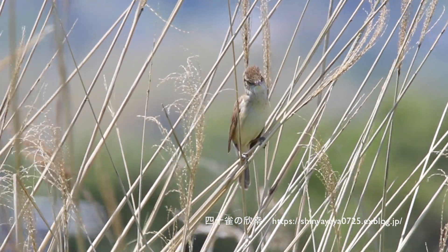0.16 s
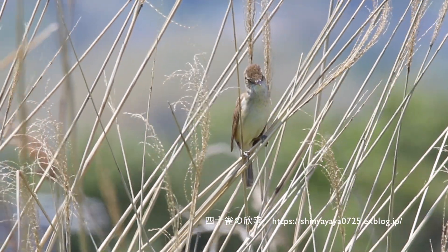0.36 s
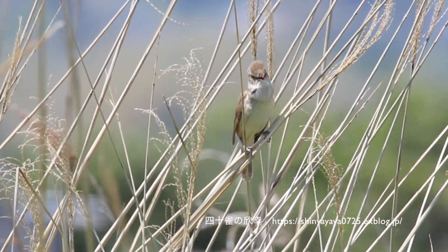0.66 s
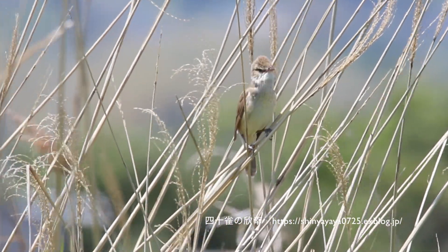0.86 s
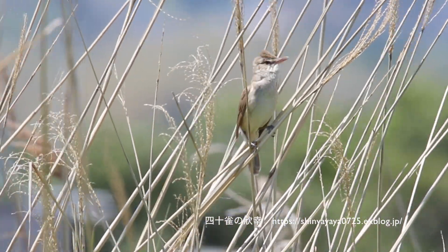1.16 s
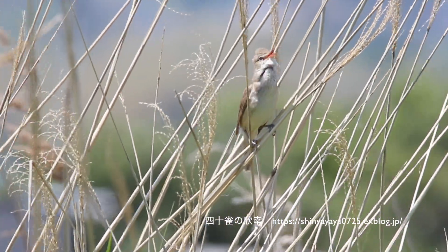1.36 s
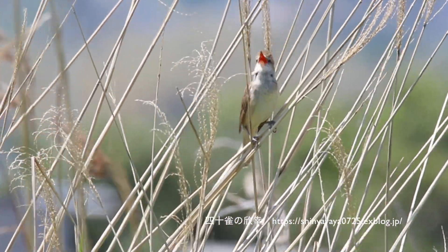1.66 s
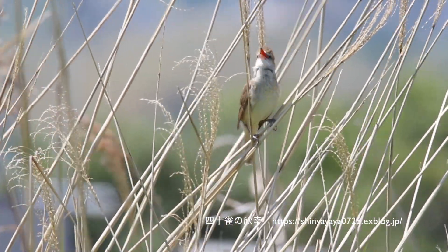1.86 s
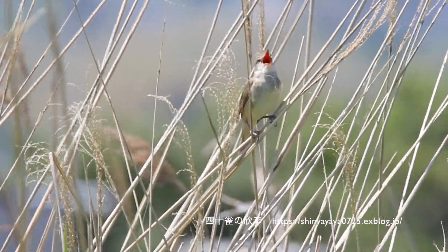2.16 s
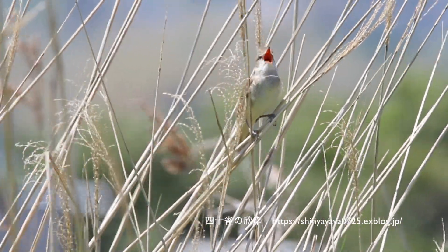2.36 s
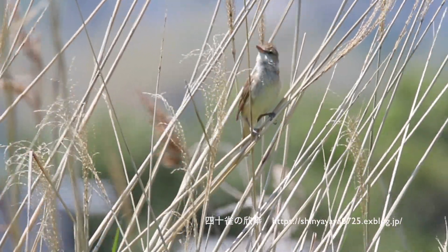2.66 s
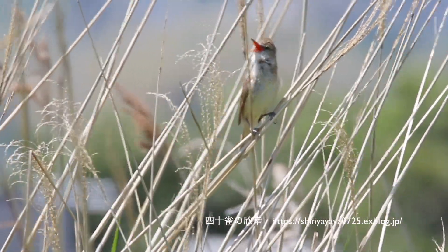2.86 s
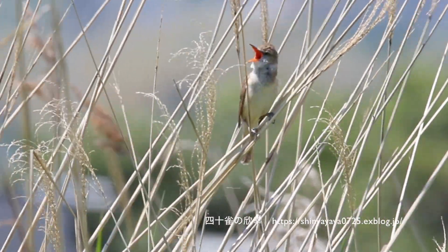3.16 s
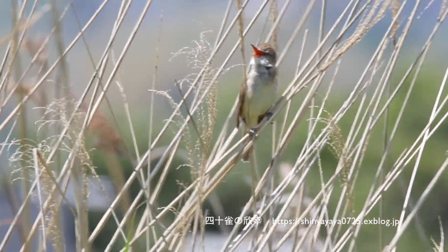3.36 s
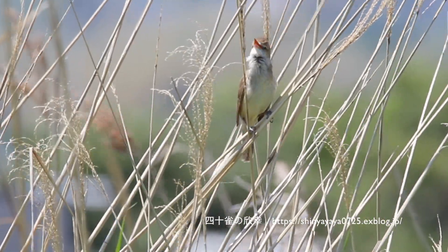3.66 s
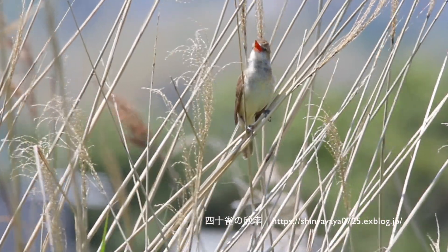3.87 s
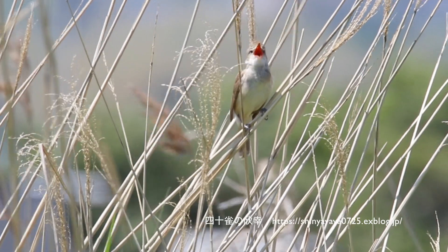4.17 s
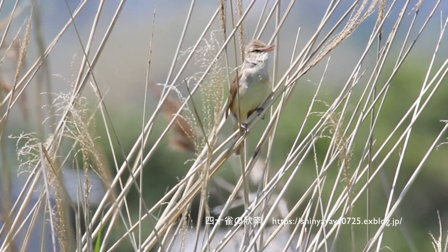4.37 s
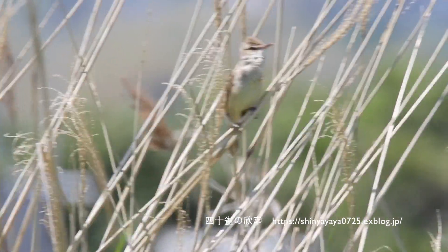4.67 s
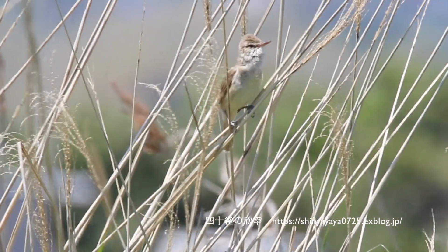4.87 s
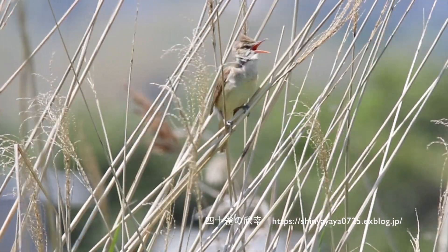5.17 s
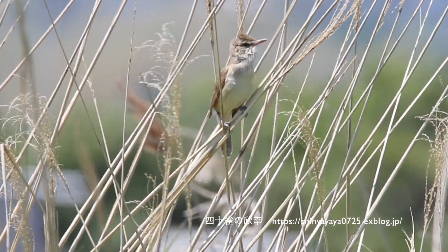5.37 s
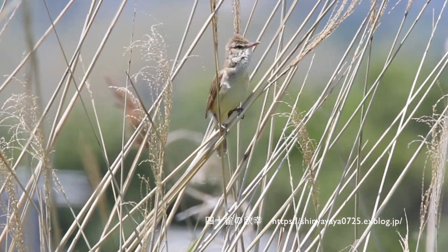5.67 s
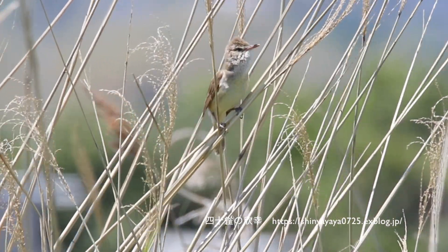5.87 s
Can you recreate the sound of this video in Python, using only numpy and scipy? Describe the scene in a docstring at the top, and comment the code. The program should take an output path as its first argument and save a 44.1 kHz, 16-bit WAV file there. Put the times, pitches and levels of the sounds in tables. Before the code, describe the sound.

In a reed bed, one small bird a few metres away opens with three separate notes, then runs through a harsh, grating pattern four times: paired croaks, a husky squeak, and high ticking rasps. It ends with a few spaced chucks and a lower rattle. The notes are dry with only a faint tail, above a quiet steady background wash, a low hum and slight wind rumble.

```python
"""In a reed bed a reed warbler sings from a stem a few metres away. After a croak, an arching note and a
whistle it repeats one phrase: two low croaks, a thin warbled squeak, then ticks that swell into a loud
high rasp; the song thins out to soft grunts, chucks and one lower rattle. Air sets the membranes of the
syrinx oscillating, their flutter modulates the tone, and throat and bill filter it. The reeds scatter a
faint tail; behind it lie far-off noise, a low drone and puffs of breeze."""
import sys
import numpy as np
from scipy import signal
from scipy.fft import rfft, irfft, next_fast_len
from scipy.io import wavfile
from scipy.ndimage import uniform_filter1d

SR = 44100
rng = np.random.default_rng(int(sys.argv[2]) if len(sys.argv) > 2 else 0)


def generate_wav(signal):
    """Clip the signal to [-1, 1] and save it as 16-bit WAV at the path in sys.argv[1]."""
    frames = np.transpose(np.atleast_2d(signal))
    scaled = np.clip(frames, -1, 1) * 32767
    pcm = np.round(scaled).astype(np.int16)
    wavfile.write(sys.argv[1], SR, pcm)


N = 265526
TIME = np.arange(N) / SR
LAST_TICK_GAP_S = .0086  # from the onset of the last tick to the end of its run-up


def from_db(db):
    """Amplitude grows tenfold with every 20 decibels."""
    return 10 ** (np.asarray(db) / 20)


def rms_one(x):
    """Normalisation: scale a signal to unit rms."""
    return x / np.sqrt(np.mean(x ** 2) + 1e-20)


def add(out, start, sound):
    """Superposition: mix a sound in at a time in seconds."""
    at = max(round(start * SR), 0)
    out[at:at + len(sound)] += sound[:N - at]


def coloured(x, points):
    """Spectral shaping: multiply the spectrum by a curve through (Hz, dB) points."""
    hz, db = np.transpose(points)
    size = next_fast_len(x.shape[-1] + 2048)
    freqs = np.maximum(np.arange(size // 2 + 1) * SR / size, 1)
    gain = from_db(np.interp(np.log(freqs), np.log(hz), db))
    return irfft(rfft(x, size) * gain, size)[..., :x.shape[-1]]


def band_noise(size, low_hz, high_hz, order=2):
    """Band-limited noise of unit rms."""
    sos = signal.butter(order, [low_hz, high_hz], "band", fs=SR, output="sos")
    return rms_one(signal.sosfilt(sos, rng.standard_normal(size + 512))[512:])


def wander(size, rate):
    """Random modulation: a line through Gaussian values, `rate` of them a second."""
    at = np.arange(size) * rate / SR
    return np.interp(at, np.arange(size), rng.standard_normal(size))


def turns(hz):
    """Phase in radians is the running integral of frequency."""
    return 2 * np.pi * np.cumsum(hz) / SR


def swell(size, rise, fall):
    """The envelope of air pressure over one stroke; rise and fall are shares of its length."""
    u = np.linspace(0, 1, size)
    attack = np.sin(np.pi / 2 * np.minimum(u / rise, 1))
    release = np.sin(np.pi / 2 * np.minimum((1 - u) / fall, 1))
    return attack * release


def syrinx(pitch, flutter_hz, swing, depth, scatter, turbulence_db, under_db, second_db, hiss_db,
           third_db=-50, evenness=0.19, edge=1.427):
    """Uneven membrane flutter modulates a tone in frequency (swing) and amplitude (depth)."""
    size, centre = len(pitch), pitch.mean()
    beat = turns(flutter_hz * (1 + 0.313 * wander(size, 599.6))) + rng.uniform(0, 2 * np.pi)
    phase = turns(pitch * (1 - swing * np.cos(beat) + scatter * wander(size, 1518)))
    opening = np.maximum(1 + depth * np.cos(beat) + 0.16 * wander(size, 735), 0)
    turbulence = from_db(turbulence_db) * band_noise(size, centre * 0.85, centre * 1.505, order=3)
    # Unequal cycles add an undertone near half the pitch.
    undertone = from_db(under_db) * band_noise(size, centre * 0.31, centre * 0.71)
    tone = opening * (np.sin(phase) + undertone + turbulence)
    # The membranes can only swing so far, which evens out the beats.
    tone = tone / (uniform_filter1d(tone ** 2, size=17) + .05) ** (evenness / 2)
    # The throat follows the pitch and damps what lies well above it.
    throat = signal.butter(6, centre * edge, fs=SR, output="sos")
    overtones = from_db(second_db) * np.sin(2 * phase) + from_db(third_db) * np.sin(3 * phase)
    hiss = from_db(hiss_db) * band_noise(size, 900, 12500)
    return rms_one(rms_one(signal.sosfilt(throat, tone)) + opening * (overtones + hiss))


def stroke(length, first_hz, last_hz, db, turbulence_db, hiss_db, under_db=-17, rise=0.11, fall=0.45):
    """A pressure-driven oscillation: the grating tone droops and turns purer as the air runs out."""
    size = int((length + 0.003) * SR)
    u = np.linspace(0, 1, size)
    pressure = swell(size, rise, fall)
    droop = 0.15 * u * (1 - pressure)
    pitch = np.interp(u, [.15, .85], [first_hz, last_hz]) * (1 - droop)
    drive = np.clip((pitch.mean() - 2300) / 1500, 0, 1)
    # Low strokes growl with an undertone; hard-pressed ones gain a third partial with their hiss.
    voice = syrinx(pitch, flutter_hz=420 + 90 * drive, swing=0.13 * pressure, depth=.42,
                   scatter=0.082 * pressure, turbulence_db=turbulence_db, under_db=under_db - 7.7 * drive,
                   second_db=-26, hiss_db=hiss_db, third_db=hiss_db - 6.5, evenness=.3)
    return from_db(db) * rms_one(voice * pressure)


def tick(length, hz, db):
    """A transient of the syrinx with a sharp onset and a slight arch in pitch; higher ones hiss more."""
    size = int(length * SR)
    pitch = hz * (0.96 + 0.057 * np.sin(np.linspace(0, np.pi, size)))
    drive = np.clip((hz - 3200) / 700, 0, 1)
    voice = syrinx(pitch, flutter_hz=583, swing=0.13, depth=0.24, scatter=0.049, turbulence_db=1.5,
                   under_db=-43, second_db=-35, hiss_db=-28 + 10.5 * drive, edge=1.28)
    return from_db(db) * rms_one(voice * swell(size, rise=0.12, fall=0.5))


def run_up(end, span, hz, db, stressed_lead=0, stress_db=0, count=12):
    """A pulse train under rising pressure: ticks come slower, longer, louder and higher."""
    last_tick_s, climb_hz_per_s, growth_db_per_s = .0058, 5300, 228.5
    jitter_s, scatter_db = .0002, 1.25
    out = np.zeros(N)
    steps = np.arange(count)  # counted backward from the last tick
    leads = np.cumsum(LAST_TICK_GAP_S * .935 ** steps)
    stress = stress_db * (steps == np.argmin(abs(leads - stressed_lead)))
    for k, lead, (early, louder) in zip(steps, leads, rng.standard_normal((count, 2))):
        back = lead - leads[0]
        level_db = db - growth_db_per_s * back + stress[k] + scatter_db * louder
        sound = tick(last_tick_s * .9 ** k, hz - climb_hz_per_s * back, level_db)
        if lead <= span:
            add(out, end - lead - jitter_s * early, sound)
    return out


def croaks(gap_s=0.0039, slide_hz=145):
    """Three pulses of pressure make a low croak: a gliding accent, then two beats of growl."""
    # Each row: start, lead-in window, stroke spacing and length in seconds; first and last accent pitch
    # and growl pitch in Hz; accent, middle and last beat levels in dB; relative accent hiss in dB.
    calls = [(0.0, 0, .018, 0.043, 2840, 3010, 2680, -26, -25, -38, -30),
             (1.38, .011, 0.022, 0.052, 2515, 2390, 2260, -22.5, -23.5, -21.5, -39),
             (1.472, 0, .018, 0.059, 3044, 3130, 2395, -23, -23.5, -22.5, -24.5),
             (2.011, .011, .018, 0.051, 2547, 2333, 2235, -20.5, -23, -19.5, -37),
             (2.101, 0, 0.022, 0.058, 3153, 3240, 2372, -20, -22.5, -22.5, -26.5),
             (2.9, .011, .019, .054, 2700, 2260, 2230, -22.5, -26.5, -23, -37),
             (2.992, 0, .019, 0.053, 2990, 2880, 2370, -18.5, -23, -21, -33),
             (3.774, .011, .018, 0.053, 2870, 2250, 2280, -22, -20, -20, -28),
             (3.865, 0, 0.02, 0.059, 2800, 2946, 2390, -18, -22.5, -21.5, -33)]
    growl = dict(turbulence_db=-8, hiss_db=-34, rise=0.18)
    out = np.zeros(N)
    for (start, lead, spacing, length, first_hz, last_hz, growl_hz,
         accent_db, middle_db, last_db, hiss_db) in calls:
        beat_s, last_beat_s = spacing - gap_s, max(length - 2 * spacing, gap_s)
        out += run_up(start, lead, first_hz, accent_db - 12.5, count=1)
        rise = .3 if lead >= LAST_TICK_GAP_S else 0.063  # an accent led in by a tick starts gently
        accent = stroke(beat_s, first_hz, last_hz, accent_db,
                        turbulence_db=-10.5, hiss_db=hiss_db, rise=rise)
        middle = stroke(beat_s, growl_hz + slide_hz / 2, growl_hz - slide_hz / 2, middle_db, **growl)
        last = stroke(last_beat_s, growl_hz, growl_hz, last_db, **growl)
        for k, beat in enumerate([accent, middle, last]):
            add(out, start + k * spacing, beat)
    return out


def arch(pause_s=.007):
    """A frequency glide roughened by flutter: after two soft ticks it climbs, breaks and sinks."""
    # The note's contour. Each row: time in seconds, pitch in Hz, level in dB.
    contour = [(.785, 2200, -34), (0.788, 2220, -19), (0.792, 2400, -29), (.801, 2360, -27),
               (.81, 2760, -21.5), (.818, 2958, -20.5), (.826, 3044, -43), (0.832, 3130, -17),
               (.841, 2700, -23), (0.857, 2100, -37)]
    times, hz, db = np.transpose(contour)
    t = np.arange(times[0], times[-1], 1 / SR)
    voice = syrinx(np.interp(t, times, hz), flutter_hz=470, swing=.06, depth=.42, scatter=.04,
                   turbulence_db=-7.5, under_db=-18, second_db=-24, hiss_db=-31, third_db=-31, edge=2.2)
    out = run_up(times[0] - pause_s, span=.02, hz=3400, db=-33, count=2)
    add(out, times[0], from_db(np.interp(t, times, db)) * voice)
    return out


def whistle():
    """Noise and random frequency modulation make a scratchy start; the note leaps, clears and falls."""
    # The slur's contour. Each row: time in seconds, pitch in Hz, level in dB.
    contour = [(1.104, 3210, -42), (1.118, 3680, -36.5), (1.127, 3840, -36.5), (1.132, 5495, -29),
               (1.141, 5550, -28), (1.152, 4900, -34), (1.164, 4370, -39), (1.169, 4430, -55)]
    times, hz, db = np.transpose(contour)
    t = np.arange(times[0], times[-1], 1 / SR)
    hoarse = np.interp(t, [1.128, 1.134], [1, 0])
    jitter = (0.02 + 0.093 * hoarse) * wander(len(t), 1960)
    phase = turns(np.interp(t, times, hz) * (1 + jitter))
    scratch = from_db(-1.5) * hoarse * band_noise(len(t), 2360, 4900) * (1 + 0.54 * wander(len(t), 560))
    voice = np.sin(phase) * (1 - 0.37 * hoarse) + from_db(-22) * np.sin(2 * phase) + scratch
    out = np.zeros(N)
    add(out, times[0], from_db(np.interp(t, times, db)) * rms_one(voice))
    return out


def squeaks(warble_hz=132, swing=0.098, lower_hz=4050, husk_db=-9):
    """Biphonation: one side of the syrinx makes a thin husky warble and the other joins in lower down."""
    # Each row: start and length in seconds; first, top and last pitch in Hz; level in dB;
    # gain of the lower voice in dB ahead of its fade-in.
    calls = [(1.605, 0.079, 5200, 5970, 4600, -34.5, -4), (2.227, 0.076, 5270, 6030, 4870, -37, 5.5),
             (3.123, 0.075, 5100, 5870, 4856, -36.5, 0.5), (4.009, 0.077, 4700, 5860, 5000, -34, -1.5)]
    out = np.zeros(N)
    for start, length, first_hz, top_hz, last_hz, db, lower_db in calls:
        size = int(length * SR)
        u = np.linspace(0, 1, size)
        warble = turns(warble_hz * (1 + 0.149 * wander(size, 140)))
        sweep = np.sin(warble) + 0.35 * np.cos(2 * warble)  # lingers at the top, dips quickly
        pitch = np.interp(u, [0, .3, .55, 1], [first_hz, top_hz, top_hz, last_hz]) * (1 + swing * sweep)
        upper = syrinx(pitch, flutter_hz=503, swing=0.014, depth=0.22, scatter=0.028,
                       turbulence_db=-27, under_db=-18.5, second_db=-16, hiss_db=-18)
        upper *= 1 - 0.28 * np.cos(warble)  # loudest on each downward sweep
        upper *= from_db(3.8 * wander(size, 205))
        lower_phase = turns(lower_hz * (1 + 0.087 * wander(size, 902)))
        lower = np.sin(lower_phase) * (1 - 0.57 * np.sin(warble))
        husk = from_db(husk_db) * band_noise(size, 2900, 6400, order=3)
        voice = upper + from_db(lower_db) * u * lower + husk
        add(out, start, from_db(db) * rms_one(voice * (1.2 + u) * swell(size, rise=0.07, fall=0.25)))
    return out


def rattles(catch_s=.004, gap_s=.0026):
    """Pressure builds through a run of ticks to a short catch, then breaks into a sustained rasp."""
    # Each row: start of the catch, run-up window and lead of the stressed tick in seconds; its stress
    # in dB; length of catch and rasp in seconds; tick pitch, first and last rasp pitch in Hz;
    # last tick and rasp levels in dB; relative turbulence and hiss in dB.
    calls = [(1.7688, .058, .009, -1.5, .022, 3790, 3894, 3670, -22, -18.5, -8, -17),
             (2.399, .063, .053, 6.5, 0.015, 4080, 3965, 3980, -21.5, -17, -2.5, -16),
             (2.538, .047, .009, 7.5, 0.02, 4110, 4070, 4000, -25.5, -17.5, -8.5, -19),
             (3.298, .069, .044, 7.5, 0.016, 4180, 3786, 3970, -20.5, -15.5, -4, -18),
             (3.4597, .041, .037, 1.5, .021, 4130, 4175, 4055, -21, -14.5, -0.5, -17),
             (4.185, .063, .044, 6.5, 0.022, 4030, 4090, 3860, -21.5, -15.5, -9.5, -20),
             (4.3486, .053, .044, 2.5, 0.021, 4170, 4000, 3940, -21.5, -15, 1, -16.5),
             (5.3156, 0.053, .032, 4, .021, 3400, 3060, 2830, -25.5, -19, -10, -27.5)]
    out, onset_s = np.zeros(N), catch_s + gap_s
    for (start, span, stressed_lead, stress_db, length, tick_hz, first_hz, last_hz,
         tick_db, db, turbulence_db, hiss_db) in calls:
        out += run_up(start, span, tick_hz, tick_db, stressed_lead, stress_db)
        catch = stroke(catch_s, first_hz, first_hz, db + .7, turbulence_db, hiss_db)
        rasp = stroke(length - onset_s, first_hz, last_hz, db, turbulence_db, hiss_db, fall=0.43)
        add(out, start, catch)
        add(out, start + onset_s, rasp)
    return out


def grunts():
    """Soft hoarse notes with the bill nearly shut: a low fundamental and a strong second harmonic."""
    # Each row: start and length in seconds, pitch in Hz, level in dB.
    calls = [(4.834, 0.017, 1372, -30), (5.597, 0.019, 1337, -31)]
    out = np.zeros(N)
    for start, length, hz, db in calls:
        size = int(length * SR)
        voice = syrinx(np.full(size, hz), flutter_hz=390, swing=0.086, depth=0.35, scatter=0.06,
                       turbulence_db=-6, under_db=-26, second_db=-3, hiss_db=-28)
        add(out, start, from_db(db) * rms_one(voice * swell(size, rise=0.27, fall=0.36)))
    return out


def chucks(flick_lead_s=.0098, flick_s=0.0046):
    """Pitch follows pressure: after an upward flick, a fairly clear stroke sinks as the air drains."""
    # Each row: start and length of the fall in seconds, first and last pitch in Hz, level in dB.
    calls = [(4.8785, 0.0258, 2754, 2260, -19), (5.639, .031, 2700, 2210, -22)]
    breath = dict(turbulence_db=-14, hiss_db=-31)
    out = np.zeros(N)
    for start, length, first_hz, last_hz, db in calls:
        flick = stroke(flick_s, first_hz=2270, last_hz=2700, db=db - 2.5, under_db=-25, **breath)
        add(out, start - flick_lead_s, flick)
        add(out, start, stroke(length, first_hz, last_hz, db, under_db=-19.5, fall=0.76, **breath))
    return out


def bill(source):
    """Source and filter: throat and open bill reshape the levels that the syrinx gives each note."""
    # Each row: frequency in Hz, gain in dB.
    response = [(500, -17), (1250, 1), (1700, -5.5), (2150, -1), (2600, -3.5), (3700, 1), (4800, -0.5),
                (5600, -5), (6800, 0), (8000, 3.5), (10500, 8), (16000, -10)]
    return coloured(source, response)


def direct_path(song, right_lag_s=4.5e-5, right_db=3):
    """Interaural time and level differences: slightly earlier on the left, louder on the right."""
    size = next_fast_len(N + 2048)
    freqs = np.arange(size // 2 + 1) * SR / size
    delay = np.exp(-2j * np.pi * freqs * right_lag_s)
    late = irfft(rfft(song, size) * delay, size)[:N]
    return np.array([song, from_db(right_db) * late])


def ringing(song, hz=3600, width_hz=12, db=-12.5):
    """A narrow resonance decays slowly, so a faint ring hangs on after the high rasps."""
    radius = np.exp(-np.pi * width_hz / SR)
    poles = [1, -2 * radius * np.cos(2 * np.pi * hz / SR), radius ** 2]
    zeros = (1 - radius ** 2) / 2 * np.array([1, 0, -1])
    return from_db(db) * signal.lfilter(zeros, poles, song + 1e-18)


def early_echo(song, delay_s=.018, db=-19.5, cutoff_hz=4300):
    """One early reflection, probably off the ground, returns a dull copy of the song."""
    dull = signal.sosfilt(signal.butter(2, cutoff_hz, fs=SR, output="sos"), song + 1e-18)
    out = np.zeros(N)
    add(out, delay_s, from_db(db) * dull)
    return out


def reed_bed(song, near_db=-17, near_t60=0.032, far_db=-20, far_t60=0.43):
    """Scattering: near stems return a quick spray of echoes, the wider bed a faint long one."""
    # What the reeds throw back. Each row: frequency in Hz, further gain on both sprays in dB.
    reed_colour = [(500, -12), (2000, 9), (4000, 5.5), (7000, 1), (10000, -1.5), (16000, 0)]
    t = TIME[:SR // 2]
    sides = []
    for side in range(2):
        near = rng.standard_normal(len(t)) * from_db(-60 * t / near_t60) * (t > .002)
        far = rng.standard_normal(len(t)) * from_db(-60 * t / far_t60) * (t > .012)
        echoes = (from_db(near_db) * rms_one(near) + from_db(far_db) * rms_one(far)) / np.sqrt(len(t))
        sides.append(signal.fftconvolve(song, echoes)[:N])
    return coloured(np.array(sides), reed_colour)


def far_noise():
    """Partial coherence: steady far-off noise has one part common to both sides and one opposed."""
    # The spectra of the two parts. Each row: frequency in Hz, relative spectral density in dB.
    mid_spectrum = [(20, 2.5), (40, -1), (80, -1.5), (170, -4), (400, -4), (800, -3), (950, -7), (1400, -5),
                    (2200, -9), (3000, -13.5), (5000, -17.5), (8000, -26), (16000, -27.5)]
    side_spectrum = [(20, 3), (40, -1.5), (80, -3.5), (170, -4), (400, -8), (1000, -13), (2000, -16),
                     (3000, -18), (5000, -21.5), (8000, -30), (16000, -31)]
    mid = from_db(-40.5) * rms_one(coloured(rng.standard_normal(N), mid_spectrum))
    side = from_db(-43) * rms_one(coloured(rng.standard_normal(N), side_spectrum))
    return np.array([mid + side, mid - side]) * from_db([[1.2], [-1.2]])


def drone():
    """Narrow-band noise has a rough pitch: three low bands make a drone."""
    # Each row: centre and width in Hz, level in dB, then signed gains for left and right.
    bands = [(114.6, 20.5, -42.5, 0.79, -1.06), (219.4, 33.5, -45.5, 0.088, 0.98),
             (308.4, 53.6, -44.5, 0.9, 0.34)]
    return sum(from_db(db) * np.outer([left, right], band_noise(N, hz - width / 2, hz + width / 2))
               for hz, width, db, left, right in bands)


def breeze():
    """Puffs of breeze are slow pressure fluctuations: a deep rumble, uncorrelated between the sides."""
    # Each row: time of the peak and half-width at 1/e in seconds, peak level in dB.
    puffs = [(1.817, 0.032, -36), (2.05, 0.16, -40), (2.507, 0.19, -43), (3.2, .3, -49), (3.9, 0.097, -39),
             (4.1, 0.18, -58)]
    envelope = sum(from_db(db) * np.exp(-((TIME - peak) / width) ** 2) for peak, width, db in puffs)
    return envelope * np.array([band_noise(N, 31, 43.6, order=1) for side in range(2)])


def scene():
    """Direct song, its ring, its reflections and the background add by superposition."""
    song = bill(croaks() + rattles() + chucks() + arch() + grunts() + squeaks() + whistle())
    direct = direct_path(song)
    return direct + ringing(direct) + early_echo(song) + reed_bed(song) + far_noise() + drone() + breeze()


def record(dry, cutoff_hz=15950):
    """Band limiting: a steep low-pass filter removes the highest treble."""
    return signal.sosfilt(signal.ellip(10, .1, 70, cutoff_hz, fs=SR, output="sos"), dry)


dry = scene()
out = record(dry)
generate_wav(out)
```